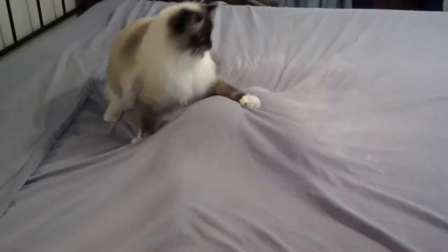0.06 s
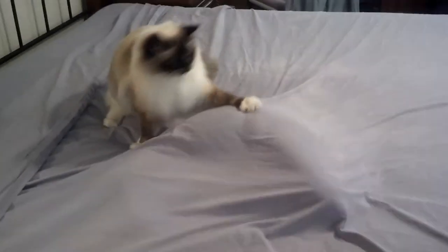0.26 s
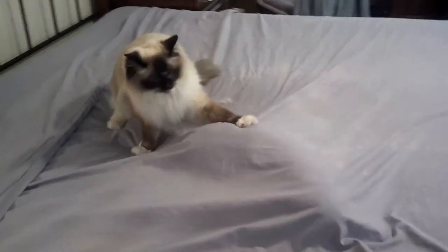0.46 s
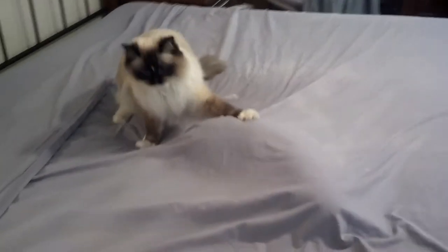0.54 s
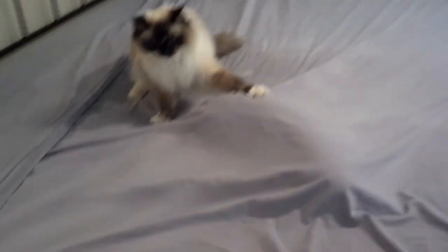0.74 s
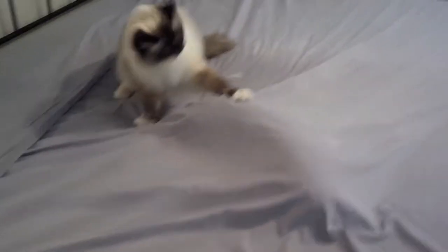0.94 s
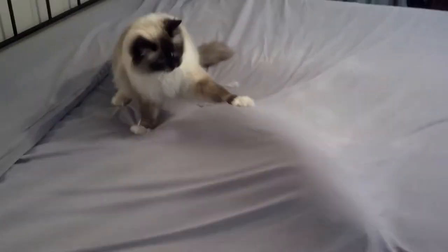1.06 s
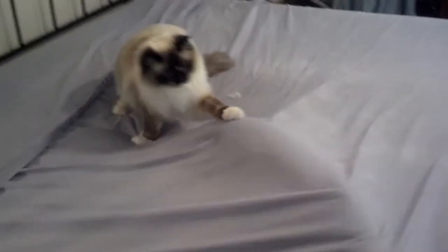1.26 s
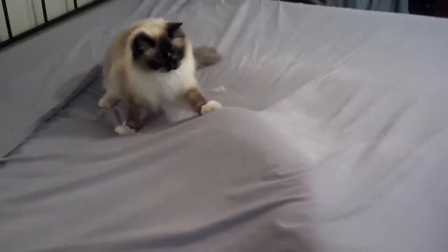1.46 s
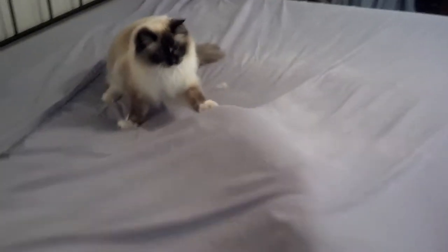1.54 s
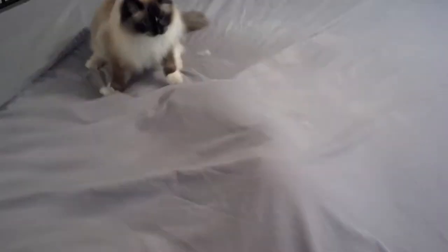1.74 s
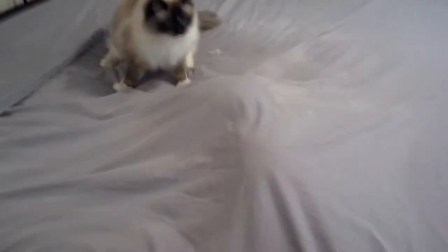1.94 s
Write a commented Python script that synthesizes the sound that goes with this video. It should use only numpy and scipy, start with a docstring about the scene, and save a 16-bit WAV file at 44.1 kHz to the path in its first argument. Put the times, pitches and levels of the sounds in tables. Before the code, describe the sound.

A bed sheet rustles softly, moved from beneath while a cat paws it. It starts nearly still; around 0.2 s a tick and soft thump, then a tiny falling zip at 0.33 s. Folds drag strongest near 0.7 s, with a tick at 0.8 s. Light bumps at 0.9 s, clustered dull thumps at 1.12-1.15 s, a heave at 1.4 s, crisp double tap at 1.58 s, then gentle rustling over quiet room hush and faint high whine.

```python
"""A quiet bedroom's soft room tone, made of tinted noise, and a faint high whine, made of a drifting sine, run
throughout, beneath the sounds of the sheet. Under it a hand moves while a cat watches: many small random catches
make the cloth heave, drag and slide. Short rings make ticks, a falling tone makes a zip, and soft pushes make the
mattress thump, with a crackle on top. Blows, ticks and zip return once from a near surface, then from the room.
Two close microphone ports are cross-fed with a short delay, which widens the image and combs the centre."""
import sys
import numpy as np
from scipy import signal
from scipy.fft import rfft, irfft
from scipy.io import wavfile
from scipy.ndimage import uniform_filter1d

SR = 44100
rng = np.random.default_rng(int(sys.argv[2]) if len(sys.argv) > 2 else 0)


def log_audio(samples):
    """Write samples as a 16-bit WAV file to the path given in sys.argv[1]."""
    # one column per channel
    frames = np.atleast_2d(samples).T
    # limit to full scale, then quantise
    limited = np.clip(frames, -1, 1)
    pcm = np.round(limited * 32767).astype(np.int16)
    wavfile.write(sys.argv[1], SR, pcm)


def undo_db(level):
    """Turn decibels back into plain size, where 20 dB means ten times bigger."""
    steps = np.asarray(level, float) / 20
    return 10 ** steps


N = 88200  # samples, two seconds
ECHO_S = 0.0057  # delay of the near return


def rms_one(x):
    """Scales a signal to an average strength (rms) of 1."""
    return x / np.sqrt(np.mean(x ** 2) + 1e-20)


def at_hz(points, hz):
    """Reads a curve of (pitch, value) points, with straight lines over log pitch."""
    pitch_hz, value = np.array(points).T
    return np.interp(np.log(np.maximum(hz, 1)), np.log(pitch_hz), value)


def drift(rate_hz):
    """Slow random wandering of spread 1: noise smoothed twice, computed at every 40th sample."""
    r = np.exp(-80 * np.pi * rate_hz / SR)
    noise = rng.standard_normal(N // 40 + 2002)
    slow = signal.lfilter([1], [1, -2 * r, r * r], noise)[2000:]  # skips the filter's start
    return np.interp(np.arange(N) / 40, np.arange(len(slow)), rms_one(slow))


def ring(clicks, hz, t60_s):
    """A resonance: a unit click starts a sine of height 1 that falls by 60 dB in t60_s."""
    r = undo_db(-60 / (t60_s * SR))
    w = 2 * np.pi * hz / SR
    return signal.lfilter([0, np.sin(w)], [1, -2 * r * np.cos(w), r * r], clicks + 1e-18)


def band_pass(x, order, low_hz, high_hz):
    """Keeps the pitches between two limits."""
    return signal.sosfilt(signal.butter(order, [low_hz, high_hz], "band", fs=SR, output="sos"), x)


def coloured(pair, spectrum, side, patchy_db, rate_hz):
    """Tints port sum and difference; overlapping octave-spaced bands each flicker; the sum has rms 1."""
    hz = np.arange(N // 2 + 1) * SR / N
    shared = drift(rate_hz / 2)
    side_gain = np.array([hz ** 0, undo_db(at_hz(side, hz))])
    shaped = rfft(pair) * undo_db(at_hz(spectrum, hz)) * side_gain
    octave = np.clip(np.log2(np.maximum(hz, 1) / 125), 0, 7)
    out = 0
    for k in range(8):
        band = irfft(shaped * np.maximum(1 - abs(octave - k), 0), N)
        out = out + band * undo_db(patchy_db * (0.71 * shared + drift(rate_hz)))
    return out / np.sqrt(np.mean(out[0] ** 2))


def at_ports(out, sound, start_s, lag):
    """A short sound reaches the left port lag samples after the right; added as sum and difference."""
    k = np.arange(len(sound))
    left = np.interp(k - 4 - lag / 2, k, sound)
    right = np.interp(k - 4 + lag / 2, k, sound)
    both = np.zeros_like(out)
    start = int(start_s * SR)
    both[:, start:start + len(k)] = (left + right) / 2, (left - right) / 2
    return out + both


def room_tone():
    """The steady hush of the room: noise, tinted and gently flickering."""
    # Tint of the hush: pitch_hz [Hz], relative level_db [dB]
    hush_spectrum = [(40, 5), (70, -1.5), (130, 2), (250, -1), (400, -1.5), (650, -18), (1000, -19.5),
                     (2100, -25), (4800, -26), (7600, -30), (10500, -33.5), (13000, -28.5), (14500, -22.5),
                     (16000, -30)]
    # Port difference against port sum: pitch_hz [Hz], level_db [dB]
    still_side = [(40, -44), (70, 1.5), (400, -1), (1000, 6.5), (2500, 3), (16000, -3.5)]
    noise = rng.standard_normal((2, N))
    return undo_db(-59) * coloured(noise, hush_spectrum, still_side, patchy_db=1.2, rate_hz=2.9)


def high_whine():
    """A faint high sine whose pitch and level wander a little, the same at both ports."""
    pitch_hz = 14825 + 10 * drift(2.8)
    whine = undo_db(-90 + drift(3.6)) * np.sin(2 * np.pi * np.cumsum(pitch_hz) / SR)
    return whine * [[1], [0]]  # nothing in the difference


def fibres(per_s, smooth):
    """Fibres catch and let go at random, in clumps, over a share of smooth friction."""
    spread_db = 3
    sizes = undo_db(spread_db * np.minimum(rng.exponential(1, N), 5))
    happens = rng.random(N) < per_s * undo_db(4 * drift(25)) / SR
    catches = rms_one(sizes * happens) * rng.choice([-1, 1], (2, N))
    return catches + smooth * rng.standard_normal((2, N))


def cloth():
    """Heaving bedding, dragging folds and the sliding weave, each a rush of fibre catches."""
    # Motion of the sheet: time_s [s], low heave of the bedding heave_db [dB],
    # drag of the folds drag_db [dB], bright slide over the mattress slide_db [dB]
    motion = [(0, -70, -65.5, -70.5), (0.128, -60.5, -69, -64), (.2, -59, -59, -59.5), (.3, -54, -62, -62),
              (.38, -52.5, -64.5, -65.5), (.45, -58, -59.5, -69), (.495, -53.5, -57.5, -66),
              (.52, -57, -65.5, -67), (.57, -59, -58.5, -73), (.64, -55.5, -56.5, -56.5),
              (.69, -55.5, -50.5, -71), (0.728, -45, -51.5, -67), (0.772, -61, -66, -74),
              (.82, -67, -66.5, -62.5), (.88, -61, -63, -70), (.98, -55, -62, -61),
              (1.08, -56.5, -56, -56.5), (1.17, -49, -57.5, -59.5), (1.28, -63, -63, -62),
              (1.359, -56.5, -70.5, -68), (1.386, -49.5, -55, -66), (1.418, -45.5, -54.5, -69),
              (1.47, -55.5, -69, -68), (1.56, -65.5, -65.5, -66.5), (1.65, -54, -64, -72),
              (1.75, -52, -68.5, -68.5), (1.87, -55, -71, -71), (2, -61, -70.5, -69.5)]
    # Tints of the three layers: pitch_hz [Hz], relative level_db [dB per Hz]
    heave_spectrum = [(60, -28), (130, 3.5), (250, 1), (420, -2.5), (650, -12), (1200, -23), (16000, -56)]
    drag_spectrum = [(150, -26), (400, 4), (700, 4.5), (1100, 2), (1900, 0.5), (3400, -13), (6000, -27),
                     (16000, -24)]
    slide_spectrum = [(300, 10), (1200, -19.5), (2500, 1), (4800, 3), (7600, -3.5), (10300, -8.5),
                      (13000, -3.5), (15500, 3.5)]
    # Port difference against port sum: pitch_hz [Hz], level_db [dB]
    moving_side = [(60, -46), (150, -21), (400, -10.5), (1000, -4.5), (2100, -3), (3500, -2.5),
                   (16000, 2.5)]
    per_s = 2000  # typical fibre catches a second in the drag
    heave = coloured(fibres(per_s / 4, smooth=1.37), heave_spectrum, moving_side, patchy_db=1.4, rate_hz=4.8)
    drag = coloured(fibres(per_s, smooth=0.74), drag_spectrum, moving_side, patchy_db=1.4, rate_hz=12)
    slide = coloured(fibres(per_s * 4, smooth=0.85), slide_spectrum, moving_side, patchy_db=0.7, rate_hz=18)
    time_s, *levels_db = np.transpose(motion)
    out = 0
    for level_db, layer in zip(levels_db, (heave, drag, slide)):
        out = out + undo_db(np.interp(np.arange(N) / SR, time_s, level_db)) * layer
    return out


def ticks_and_zip():
    """Single high rings, and a tone of thread crossings that falls as the claw slows."""
    # Short ticks of a thread or claw: start_s [s], level_db [dB], pitch_hz [Hz], t60_s [s]
    ticks = [(.2055, -37, 2050, .004), (0.3457, -43, 1210, 0.016), (0.74, -47, 13800, .012),
             (0.8218, -37, 3060, 0.006)]
    out, k = np.zeros((2, N)), np.arange(SR // 20)
    for start_s, level_db, pitch_hz, t60_s in ticks:
        out = at_ports(out, undo_db(level_db) * ring(1. * (k == 0), pitch_hz, t60_s), start_s, lag=5)

    zip_s, from_hz, to_hz = 0.024, 5200, 1500
    u = np.clip(k / (zip_s * SR), 0, 1)  # progress of the zip, 0 to 1
    wobble = 0.5 * uniform_filter1d(rng.standard_normal(len(k)), size=30)
    hz = from_hz * (to_hz / from_hz) ** u * (1 + wobble)
    level = undo_db(-55 + 3 * u) * np.sin(np.pi * u) ** 0.55
    return at_ports(out, level * np.sin(2 * np.pi * np.cumsum(hz) / SR), 0.324, lag=-3.5)


def blows():
    """A soft contact pushes air and rings the mattress; a burst of crackle rides on top."""
    # Blows of the sheet: start_s [s], peak of the push level_db [dB], contact_hz [Hz] that places the
    # push's band, gain of the crackle crack_db [dB against the push], lag between the ports [samples]
    blow_table = [(0.2228, -23.5, 275, -10.5, 4.5), (.906, -41.5, 443, -29, -1),
                  (0.9328, -30, 1200, -20.5, 4), (1.124, -24, 497, -30, 2), (1.134, -28, 317, -35, -6.5),
                  (1.1448, -41, 1400, -43, -2.5), (1.151, -30, 262, -40, 7), (1.5805, -29, 1290, -4.5, 4.5),
                  (1.5859, -31.5, 2560, -6, -2)]
    # What the mattress rings with: pitch_hz [Hz], relative drive level_db [dB], t60_s [s]
    mattress = [(145, 3.5, 0.053), (239, -2, 0.069), (356.5, 3.5, 0.03), (468.7, -2, 0.076),
                (587, -3.5, 0.013), (834, -11, 0.03), (1195, 1, 0.0074), (1720, 1.5, 0.005)]
    out, k = np.zeros((2, N)), np.arange(SR // 5)
    strengths_db = rng.normal(0, 1.1, (len(blow_table), len(mattress)))  # every blow rings a bit differently
    crackle = rng.standard_normal((len(blow_table), 400))
    crack_fade = np.exp(-k[:400] / (0.0006 * SR))
    for blow, own_db, burst in zip(blow_table, strengths_db, crackle):
        start_s, level_db, contact_hz, crack_db, lag = blow
        push = band_pass((k == 0) + 1e-18, 2, contact_hz * 0.29, contact_hz * 2.15)
        push = -push / abs(push).max()
        rings = 0
        for (pitch_hz, ring_db, t60_s), extra_db in zip(mattress, own_db):
            rings = rings + undo_db(ring_db + extra_db) * ring(push, pitch_hz, t60_s)
        sound = push + 0.66 * rings / abs(rings).max()
        snap = burst - 3 * (k[:400] == 4)  # noise with one downward click
        sound[:400] += undo_db(crack_db) * band_pass(snap, 1, 1500, 6000) * crack_fade
        out = at_ports(out, undo_db(level_db) * sound, start_s, lag)
    return out


def bedroom(x):
    """One early return from the side, then a diffuse tail that dies band by band."""
    # Tint of the tail at its start: pitch_hz [Hz], relative level_db [dB]
    room_colour = [(125, -3.5), (250, 3.5), (500, -2), (1000, -9.5), (2000, -3), (4000, -10), (8000, -2.5)]
    # Time for the tail to fall 60 dB: pitch_hz [Hz], t60_s [s]
    room_t60 = [(100, .22), (500, 0.2), (2000, 0.27), (8000, 0.11)]
    # Port difference of the tail against its sum: pitch_hz [Hz], level_db [dB]
    room_side = [(100, -21), (400, -10), (1000, 2), (3000, -3), (16000, -3)]
    t, tail = np.arange(SR // 2) / SR, 0
    for hz in 125 * 2. ** np.arange(7):
        band = band_pass(rng.standard_normal((2, len(t))), 2, hz / 2 ** .5, hz * 2 ** .5)
        fade = undo_db(at_hz(room_colour, hz) - 60 * t / at_hz(room_t60, hz))
        tail = tail + band * fade * np.array([[1], [undo_db(at_hz(room_side, hz))]])
    tail = tail * (t > ECHO_S) / np.sqrt(np.sum(tail[0] ** 2))
    wet = undo_db(-8) * signal.fftconvolve(x[:1], tail, axes=1)[:, :N]

    lag, side_lag = int(ECHO_S * SR), 5  # samples; the ports hear the return side_lag before and after lag
    near, far = np.roll(x[0], lag - side_lag), np.roll(x[0], lag + side_lag)
    return x + undo_db(-6) * np.array([near + far, near - far]) / 2 + wet


def scene():
    """Adds all sounds as port sum and difference, then turns them into left and right ports."""
    background = room_tone() + high_whine()
    moving_cloth = cloth()
    short_sounds = ticks_and_zip() + blows()
    mid, side = bedroom(short_sounds) + moving_cloth + background
    return np.array([mid + side, mid - side])


def low_pass(x):
    """Removes everything above the highest recorded frequency."""
    return signal.sosfilt(signal.butter(12, 17070, fs=SR, output="sos"), x)


def record(dry):
    """Each port has the other, delayed, taken away from it; bass and top are cut."""
    cross_lag, cross_gain = 16, 1  # samples, share of the other port
    wide = dry - cross_gain * np.roll(dry[::-1], cross_lag, axis=1)
    wide = signal.sosfilt(signal.butter(2, 81, "high", fs=SR, output="sos"), wide)  # bass cut, Hz
    wide = signal.sosfilt(signal.ellip(12, .5, 50, 15830, fs=SR, output="sos"), wide)  # steep top cut, Hz
    return low_pass(wide)


dry = scene()
out = record(dry)
log_audio(out)
```